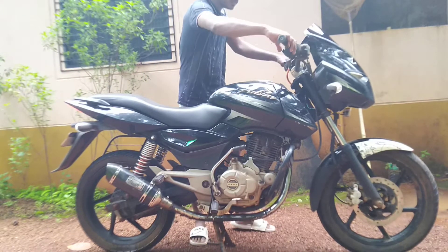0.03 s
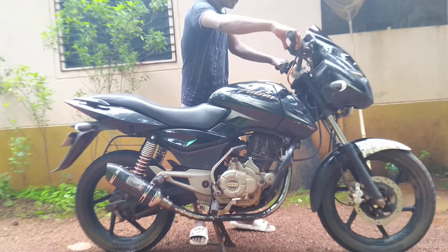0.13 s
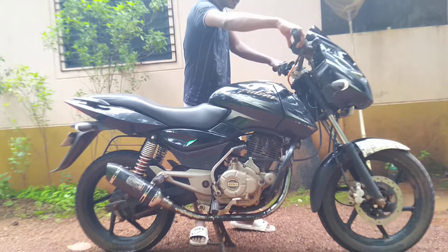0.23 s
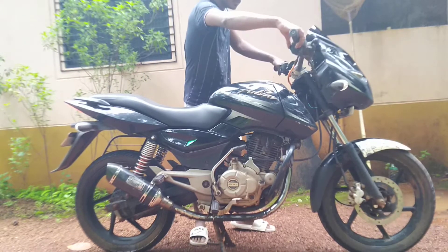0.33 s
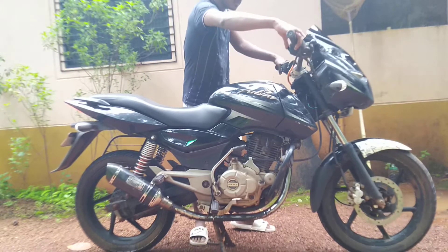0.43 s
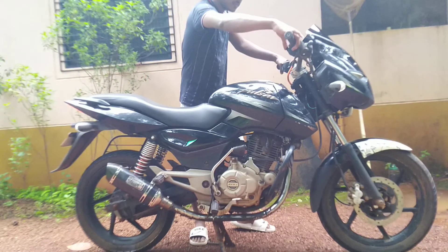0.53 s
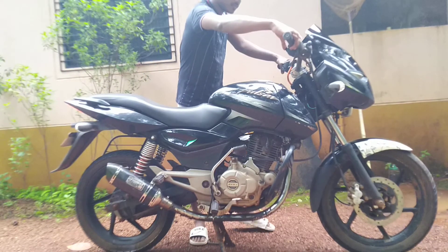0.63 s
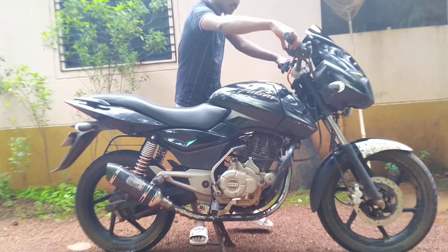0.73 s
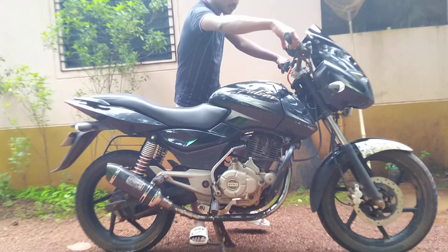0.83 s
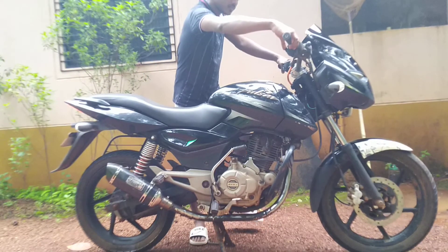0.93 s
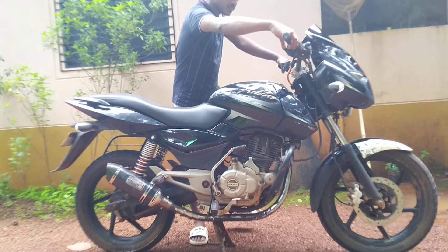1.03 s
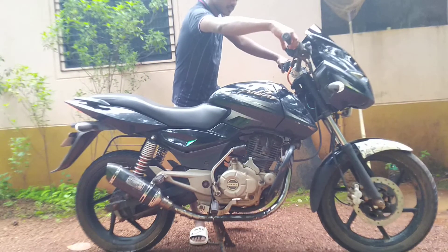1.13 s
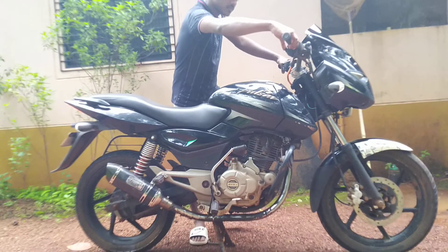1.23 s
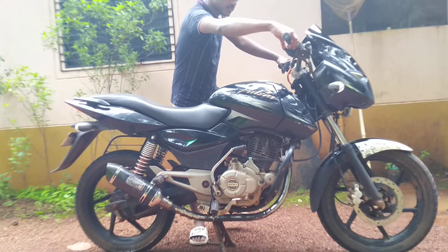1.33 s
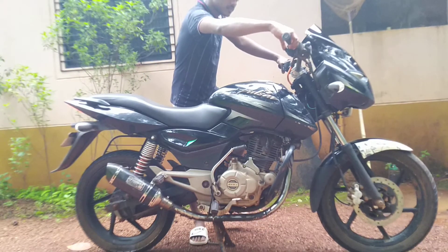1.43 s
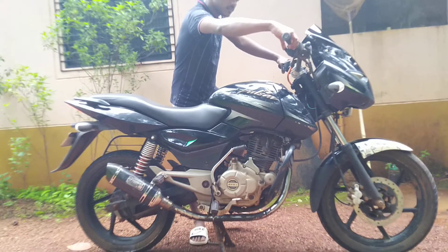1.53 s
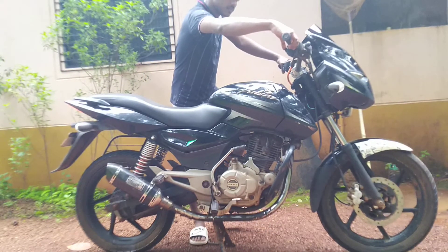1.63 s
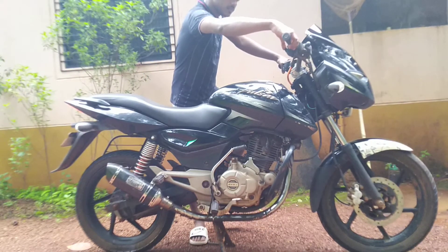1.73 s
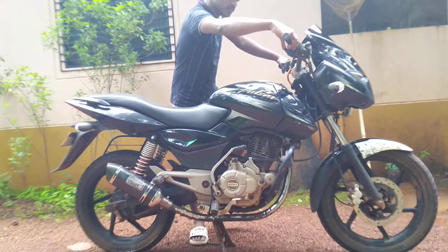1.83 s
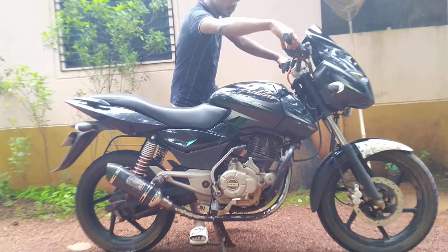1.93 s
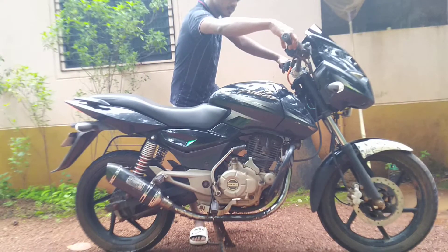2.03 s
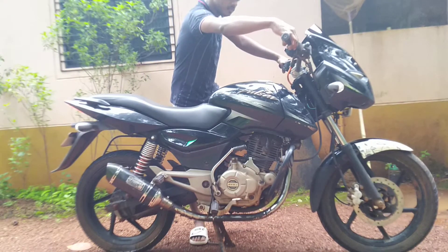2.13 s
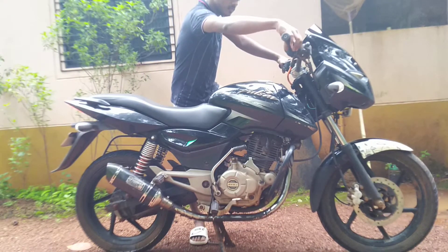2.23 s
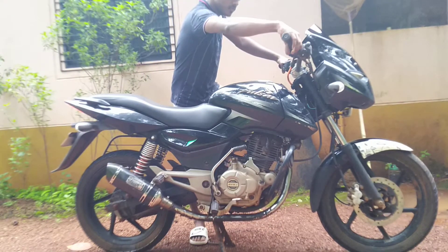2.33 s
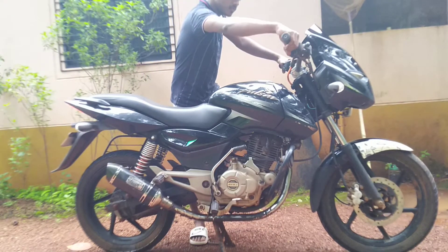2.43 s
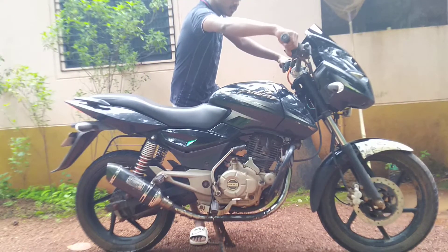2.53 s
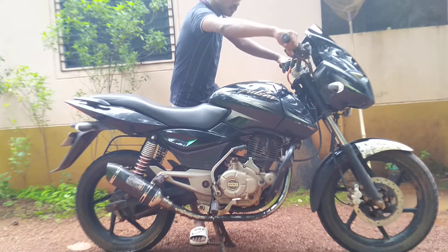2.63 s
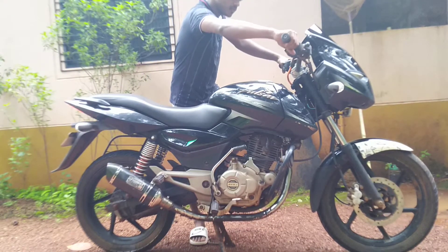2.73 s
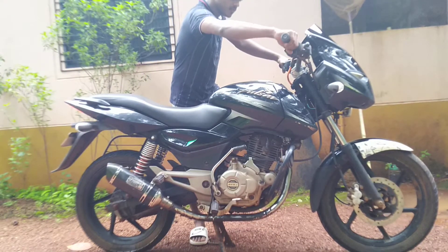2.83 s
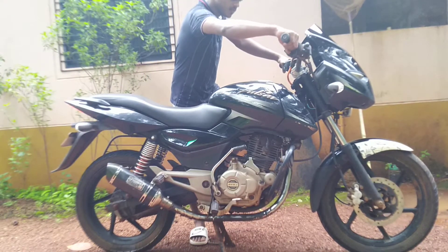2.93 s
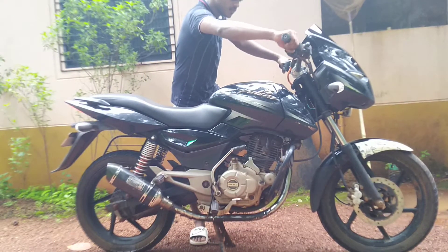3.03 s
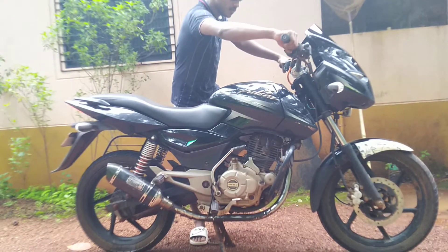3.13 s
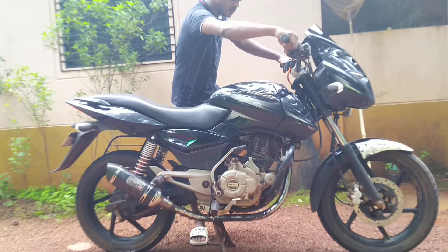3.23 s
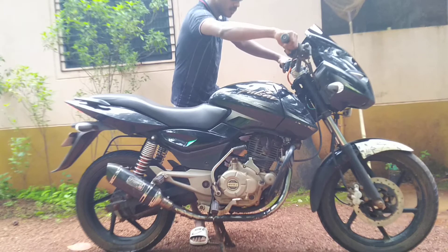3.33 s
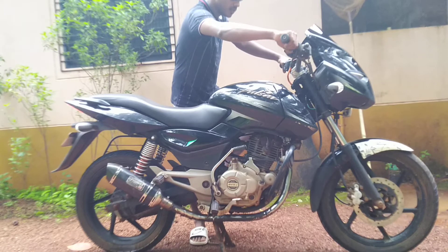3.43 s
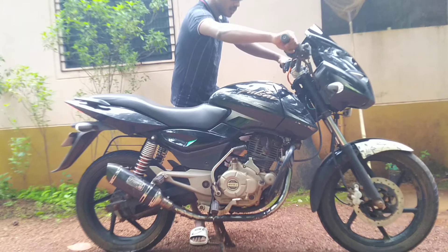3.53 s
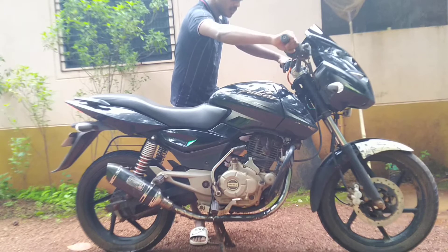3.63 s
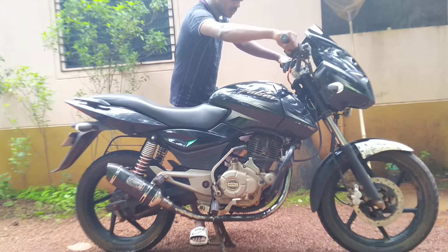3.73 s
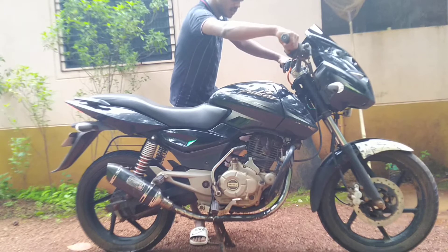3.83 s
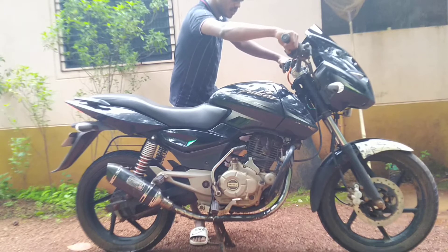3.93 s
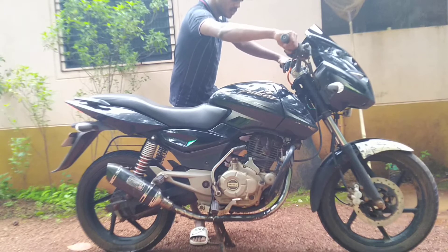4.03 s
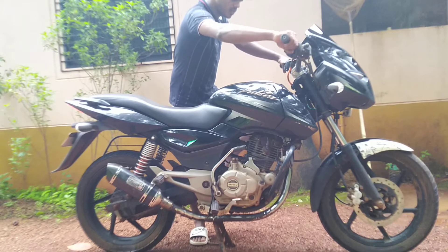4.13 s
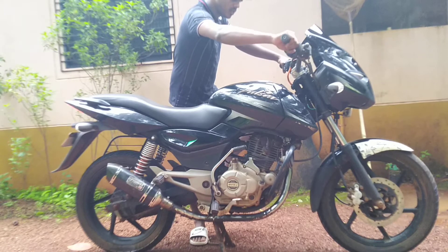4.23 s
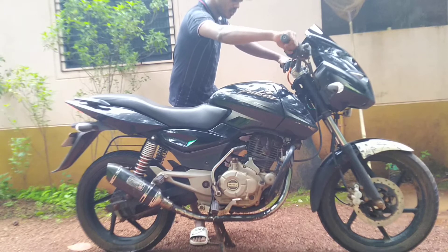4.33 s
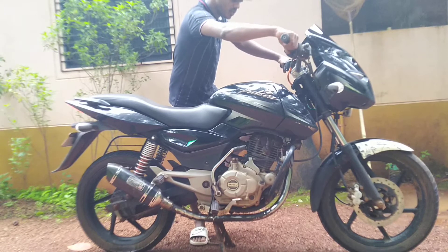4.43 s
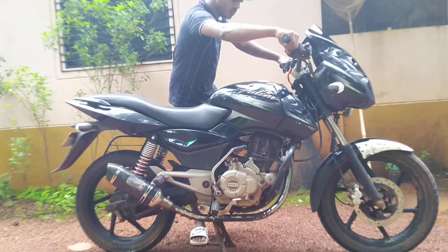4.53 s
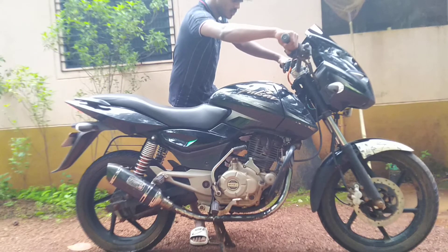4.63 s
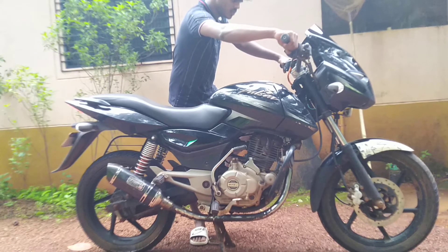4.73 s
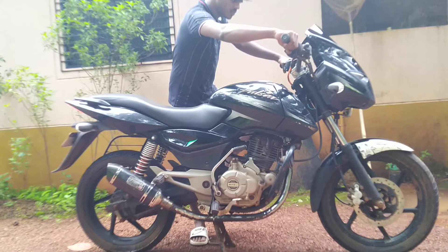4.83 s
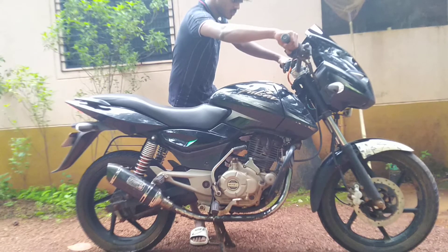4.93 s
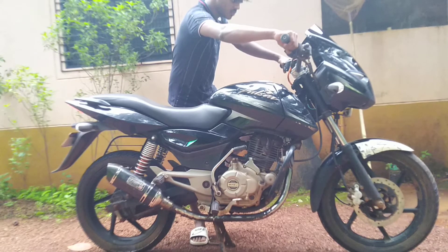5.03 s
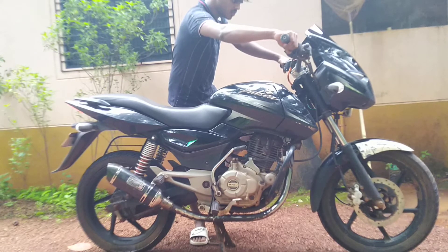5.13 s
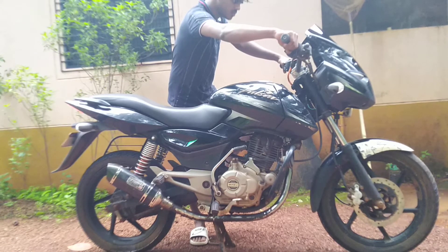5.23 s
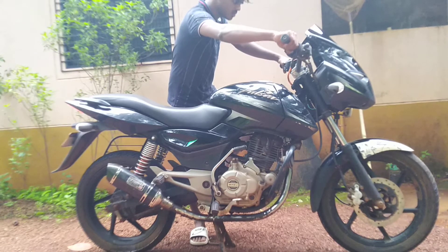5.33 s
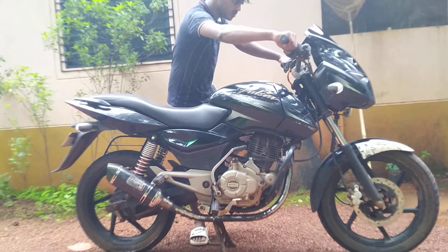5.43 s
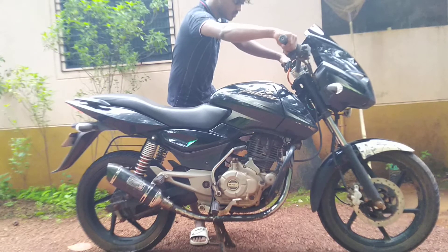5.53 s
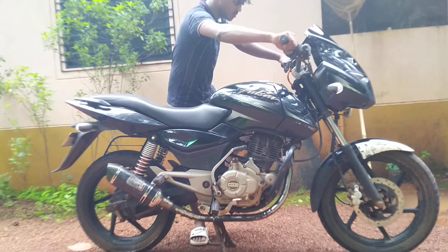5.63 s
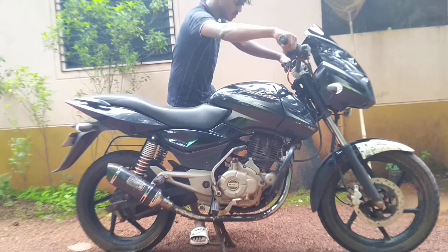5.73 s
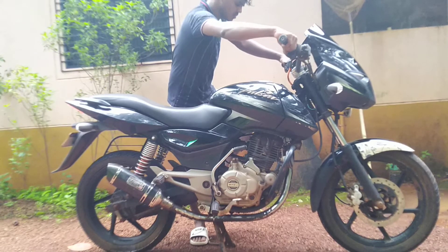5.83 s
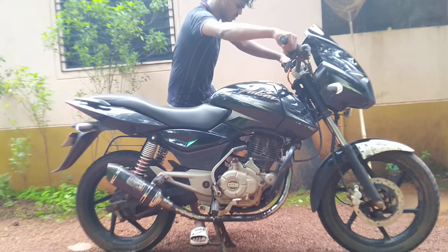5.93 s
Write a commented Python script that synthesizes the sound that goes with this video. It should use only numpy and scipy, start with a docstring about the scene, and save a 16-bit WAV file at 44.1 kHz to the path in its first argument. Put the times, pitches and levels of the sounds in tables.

```python
"""A single-cylinder motorcycle beside a house: the starter whirs, the engine catches, idles, then is blipped.
Every firing is one pressure pulse through the silencer: round with the throttle shut, a sharp bark with it open.
Gas noise rasps and spits behind the pulses; the crankcase clatters with speed; geared teeth make the whirr.
A wall and the yard answer; behind lie outdoor air, a distant motor's hum, faint tones and handlebar clicks."""
import sys
import numpy as np
from scipy import signal
from scipy.fft import rfft, irfft, next_fast_len
from scipy.io import wavfile
from scipy.ndimage import map_coordinates

SR = 44100
rng = np.random.default_rng(int(sys.argv[2]) if len(sys.argv) > 2 else 0)


def dump(signal):
    """Clip the signal to [-1, 1] and save it as 16-bit WAV at the path in sys.argv[1]."""
    limited = np.clip(np.atleast_2d(signal).T, -1, 1)
    pcm = np.round(limited * 32767).astype(np.int16)
    wavfile.write(sys.argv[1], SR, pcm)


N = 264159
TIME = np.arange(N) / SR
CRUISE_RATE_HZ = 26.1  # firings per s; octaves of speed count from here

# throttle twists: (opens [s], shuts [s], rise [s], opening [0-1], deep boom change [dB])
BLIPS = [(2.709, 2.937, 0.34, 0.93, 1), (3.051, 3.21, .04, 0.84, 1), (3.416, 3.79, .09, 0.86, -.5),
         (4.092, 4.391, 0.062, 0.92, -3), (5.077, 5.113, 0.05, 0.6, 0.5), (5.163, 5.185, 0.034, .65, 4),
         (5.276, 5.516, 0.12, 0.82, -1), (5.63, 5.742, 0.022, 0.81, -7.5)]
RELEASE_S = 0.04  # the throttle springs shut


def throttle(at=TIME):
    """Throttle opening 0-1, and the change in dB that it makes to the deep boom."""
    opening, boom_db = 0, 0
    for opens, shuts, rise, depth, db in BLIPS:
        rising = (at - opens) / rise
        falling = 1 - (at - shuts) / RELEASE_S
        twist = np.clip(np.minimum(rising, falling), 0, 1)
        opening = opening + depth * twist
        boom_db = boom_db + db * twist
    return opening, boom_db


# separate firings as the engine catches, idles and picks up: (time [s], burn force [dB])
PUFFS = [(1.385, 2.5), (1.479, 2.5), (1.568, -4.5), (1.666, 0), (1.777, .5), (1.887, 0.5), (2.003, -.5),
         (2.119, 0.5), (2.231, 0.5), (2.342, 0.5), (2.448, 1), (2.557, 0.5), (2.669, 0.5), (2.778, 4.5),
         (2.848, 3.5), (2.903, 2.5), (2.953, -0.5), (3.004, -1), (3.051, -3.5)]
# pulse with the throttle shut: (boom [dB], body [dB], bark [dB])
PUFF_DB = (39.5, 31.5, 15)
# added by a full throttle: (boom [dB], body [dB], bark [dB])
PUFF_THROTTLE_DB = (-2.5, 0.5, 13.5)


def idle_firings():
    """Rows (s, boom, body, bark) of separate puffs; a stronger burn is sharper, its boom stays."""
    times, force_db = np.transpose(PUFFS)
    opening, boom_db = throttle(times)
    burn_db = np.column_stack([boom_db, force_db, force_db])
    strength = PUFF_DB + np.outer(opening, PUFF_THROTTLE_DB) + burn_db
    return np.column_stack([times, strength])


# engine speed once the firings run together: (time [s], firing rate [1/s])
SPEED = [(3.103, 21.29), (3.238, 27.94), (3.427, 22.69), (3.562, 26.48), (3.682, 36.15), (3.77, 41.08),
         (3.803, 37.98), (3.859, 40.32), (4.107, 33.52), (4.26, 40.48), (4.425, 46.93), (4.709, 38.9),
         (4.995, 31.72), (5.2, 27.02), (5.378, 29.37), (5.501, 30.65), (5.765, 33.4), (5.99, 29.46)]
# pulse strength, throttle shut: (firing rate [1/s], boom [dB], body [dB], bark [dB])
COASTING = [(25.9, 39.5, 21, 18.5), (31.4, 35.5, 30, 20.5), (38.5, 36, 33.5, 25), (47.6, 30.5, 37.5, 27)]
# pulse strength, throttle open: (firing rate [1/s], boom [dB], body [dB], bark [dB])
PULLING = [(24.4, 34.2, 36, 29.2), (30.4, 27.3, 39.7, 34.5), (45, 37.2, 30.2, 36.8)]


def firings(jitter_s, scatter_db):
    """Rows (s, boom, body, bark), one per engine cycle; speed and throttle set each pulse's strength."""
    cycles = np.cumsum(curves(SPEED)[0] * (TIME >= SPEED[0][0])) / SR
    times = TIME[np.searchsorted(cycles, np.arange(int(cycles[-1]) + 1), side="right")]
    chance = rng.standard_normal((len(times), 2))
    speed = curves(SPEED, times)[0]
    opening, boom_db = throttle(times)
    shut = np.array(curves(COASTING, speed))
    wide = np.array(curves(PULLING, speed))
    strength = (shut + opening * (wide - shut)).T + np.outer(boom_db, [1, 0, 0])
    # one draw per firing moves its time, the other raises or lowers boom, body and bark together
    jittered = times + jitter_s * opening * chance[:, 0]
    return np.column_stack([jittered, strength + scatter_db * chance[:, 1:]])


# silencer's broad colour: (frequency [Hz], level [dB])
PIPE = [(25, -60), (48, -17.5), (68, -6.5), (95, -1.5), (165, -4), (240, -4.5), (380, -14), (510, -21.5),
        (680, -16.5), (800, -32.5), (1020, -19.5), (1400, -47.5), (2500, -53.5), (6000, -77)]
# tailpipe's higher resonances: (frequency [Hz], width [Hz], lift [dB])
PIPE_MODES = [(332.3, 15, 5.5), (397.4, 93, 3), (463.6, 28, 4), (545, 11, 6), (619, 100, 5.5),
              (683, 48, 5.5), (920, 75, 3.5), (1050, 76, -6)]
# deep resonances for single puffs: (frequency [Hz], width [Hz], lift [dB])
PUFF_MODES = [(85.2, 14.9, 11.5), (173.6, 21, 10.5), (245, 60, 4.5)]
# deep resonances in steady flow: (frequency [Hz], width [Hz], lift [dB])
FLOW_MODES = [(97.1, 40.7, 10.63), (156.4, 37, 9.1)]
# further gas surges after the first blow, under load: (share of the cycle [0-1], level [dB])
SURGES = [(0.132, -9), (0.259, -3.5), (.52, -4.5)]
# surge colour: (frequency [Hz], level [dB])
SURGE_COLOUR = [(170, -31), (320, -4), (420, 3.5), (700, -5.5), (1400, -8)]
SURGE_FADE_DB_PER_OCTAVE = 16  # above cruising speed the surges merge with the blow
FRONT_DB_PER_OCTAVE = 11.5  # and the blow's front gets steeper


def exhaust(fired, deep_modes, ripple_db, dull_db, valve_db, delay_s, size=8192):
    """Each pulse rings the silencer; strong barks have steep fronts, an open throttle adds surges."""
    hz, track = np.fft.rfftfreq(size, 1 / SR), np.zeros(N)
    pipe = along(PIPE, hz) + lifts(deep_modes + PIPE_MODES, hz)
    speeds, openings = curves(SPEED, fired[:, 0])[0], throttle(fired[:, 0])[0]
    for (s, boom, body, bark), speed, opening in zip(fired, speeds, openings):
        ripple = map_coordinates(rng.standard_normal(len(hz)), [hz / 110]) * np.clip(hz / 700, 0, 1)
        softness = np.clip((26 - bark) / 12, 0, 1)  # weak pulses have round fronts
        revved = max(np.log2(speed / CRUISE_RATE_HZ), 0)
        front = bark + dull_db * softness
        edge = front + FRONT_DB_PER_OCTAVE * revved
        source = along([(95, boom), (165, body), (430, bark), (650, front), (1400, edge)], hz)
        # coasting, gas flows for the third of a cycle that the valve is open:
        # every third order stands out and glides
        comb = np.cos(2 * np.pi * (hz / speed - 1) / 3) - 0.5
        coasting = np.clip(1 - opening, 0, 1) * np.clip((hz - 200) / 250, 0, 1)
        db = pipe + source + valve_db * coasting * comb + ripple_db * amp(bark - 36) * ripple
        cepstrum = irfft(db * np.log(10) / 20)[:size // 2]
        cepstrum[1:] *= 2  # causal: the ringing follows the blow
        blow = np.exp(rfft(cepstrum, size))
        surges = sum(amp(level) * np.exp(-2j * np.pi * hz * share / speed) for share, level in SURGES)
        surge_db = along(SURGE_COLOUR, hz) - SURGE_FADE_DB_PER_OCTAVE * revved
        surges *= np.clip(2 * opening, 0, 1) * amp(surge_db)
        add(track, s + delay_s, irfft(blow * (1 + surges)))
    return track


def running(times, level_db, per_octave_db, throttle_db):
    """Gain of a noise that starts with the first firing and follows speed and throttle."""
    speed = np.interp(TIME, (times[1:] + times[:-1]) / 2, 1 / np.diff(times))
    octaves = np.log2(speed / CRUISE_RATE_HZ)
    gain_db = level_db + per_octave_db * octaves + throttle_db * throttle()[0]
    return amp(gain_db) * (TIME > times[0])


COAST_UNTIL_S, COAST_FADE_DB_PER_S = 1.84, 32.5


def starter_coast(at=TIME):
    """Gain 0-1 of the released starter: it holds from the first firing, then fades."""
    fade_db = -COAST_FADE_DB_PER_S * np.maximum(at - COAST_UNTIL_S, 0)
    return amp(fade_db) * (at >= PUFFS[0][0])


# turbulent gas at the outlet: (frequency [Hz], level [dB])
RASP = [(150, -30.5), (300, 4), (680, 4), (800, -11.5), (1020, -8.5), (1400, -0.5), (3000, -24),
        (7000, -57)]
# its treble: (frequency [Hz], level [dB])
HISS = [(3000, -38.5), (5500, 3.5), (7600, -17.5), (9500, -2), (15000, -2)]
# sharp cracks as the throttle opens: (time [s], peak [dB])
CRACKS = [(2.7603, -40), (2.8483, -45.5), (2.9021, -45.5), (3.1007, -42.5), (3.1471, -42.5)]
HISS_DB, HISS_PER_OCTAVE_DB, HISS_THROTTLE_DB = -66, 8.5, 0
SPIT_DB = -75  # gas with each separate firing
COAST_HISS_DB = -68.5


def gas(fired):
    """Turbulent gas behind each pulse rasps and spits, its rasp stronger under load."""
    times, bark = fired[:, 0], fired[:, 3]
    rasp_db = bark - 74 + 3 * throttle(times)[0]
    rasp = bursts(times + 0.0012, rasp_db, rise=0.0009, decay=0.013) * noise(RASP, PIPE_MODES)
    gate_db = bark - 31 + rng.normal(0, 3, len(times))
    gate = unit(0.5 + bursts(times + 0.0018, gate_db, rise=0.0004, decay=0.003))
    engine_hiss = running(times, HISS_DB, HISS_PER_OCTAVE_DB, HISS_THROTTLE_DB)
    flow = (engine_hiss + amp(COAST_HISS_DB) * starter_coast()) * gate
    puffs, force_db = np.transpose(PUFFS)
    spit = bursts(puffs + 0.0018, SPIT_DB + force_db, rise=0.0005, decay=0.0027)
    cracks, peak_db = np.transpose(CRACKS)
    crack = bursts(cracks + 0.0005, peak_db - 5, rise=0.0003, decay=0.0031)  # peak to rms
    return rasp + (flow + spit + crack) * noise(HISS)


# crankcase colour: (frequency [Hz], level [dB])
CASE = [(200, -13.5), (600, -3), (1000, -0.5), (1400, -4.5), (2000, -1), (3200, -9.5), (5000, -13.5),
        (6500, -21), (7700, -40.5), (15000, -41.5)]
# crankcase ringing: (frequency [Hz], width [Hz], lift [dB])
CASE_MODES = [(1040, 70, 0.47), (1730, 92, 4.5), (2075, 83, 2), (2630, 31, 1.4), (3070, 130, 7.1),
              (3600, 27, 0.76)]
CLATTER_DB, CLATTER_PER_OCTAVE_DB, CLATTER_THROTTLE_DB = -49.5, 5, 2.5
RATTLE_DB = -46  # gears before each separate firing
COAST_WHIRR_DB, COAST_RATTLE_DB = -50.5, -42.5  # added by the coasting starter


def crankcase(fired, tick_db, scatter_db, ticks_per_cycle=5):
    """Valves and chain tick several times a cycle; at idle the gears rattle as the piston compresses."""
    times = fired[:, 0]
    tick_cycles = np.arange(len(times) * ticks_per_cycle) / ticks_per_cycle
    ticks = np.interp(tick_cycles, np.arange(len(times)), times)
    chance = rng.standard_normal((len(ticks), 2))
    tick_times, tick_levels = ticks + 0.00027 * chance[:, 0], tick_db + scatter_db * chance[:, 1]
    ticking = np.minimum(bursts(tick_times, tick_levels, rise=0.0003, decay=0.0066), 4)
    clatter = running(times, CLATTER_DB, CLATTER_PER_OCTAVE_DB, CLATTER_THROTTLE_DB)
    level = np.hypot(clatter, amp(COAST_WHIRR_DB) * starter_coast())

    puffs, force_db = np.transpose(PUFFS)
    strain_db = np.full(len(puffs), COAST_RATTLE_DB)
    straining = starter_coast() * bursts(puffs - 0.022, strain_db, rise=0.024, decay=0.018)
    rattle = bursts(puffs - 0.011, RATTLE_DB + 1.3 * force_db, rise=0.012, decay=0.007)
    squeeze = np.hypot(straining, rattle) * amp(3 * wobble(500))
    dulling = lambda hz: amp(along([(3500, 4), (6000, -6.5)], hz))
    chuff = filtered(squeeze * noise(CASE, CASE_MODES), dulling)
    return level * unit(1 + ticking) * noise(CASE, CASE_MODES) + chuff


# starter motor: (time [s], gear teeth rate [1/s], level [dB])
STARTER = [(1.279, 590, -57), (1.283, 690, -23), (1.297, 690, -35), (1.312, 710, -23.5),
           (1.324, 810, -27.5), (1.34, 1000, -23.5), (1.36, 1050, -26), (1.372, 1040, -36.5),
           (1.385, 1000, -47), (1.42, 1000, -70.5)]
# its colour: (frequency [Hz], level [dB])
STARTER_COLOUR = [(200, -46), (450, -18.5), (1020, -6.5), (1500, -6), (2070, -0.5), (2500, -10),
                  (3000, -7.5), (4100, -12.5), (5500, -24.5), (9000, -31), (15500, -35)]


def starter(grind_db, rough, harmonics=10):
    """The starter's gear teeth mesh, speeding up then easing, and ring the crankcase."""
    teeth, db = curves(STARTER)
    phase = 2 * np.pi * np.cumsum(teeth * (1 + rough * wobble(400))) / SR
    whine = sum(np.sin(k * phase + rng.uniform(0, 2 * np.pi)) for k in np.arange(harmonics) + 1)
    grind = amp(grind_db) * noise([(300, 0.021), (15000, 0.01)])  # near white
    mesh = (unit(whine) + grind) * amp(2.1 * wobble(300))
    ring = filtered(mesh, lambda hz: amp(along(STARTER_COLOUR, hz) + lifts(CASE_MODES, hz)))
    turning = (TIME > STARTER[0][0]) & (TIME < STARTER[-1][0])
    return amp(db) * turning * ring / ring[:, turning].std()


# starter whine as it spins down: (time [s], frequency [Hz], level [dB])
RUNDOWN = [(1.39, 5100, -70), (1.45, 5000, -76), (1.57, 4850, -63), (1.63, 4360, -67), (1.85, 3920, -66.5),
           (2.2, 3410, -76)]


def starter_rundown():
    """A fuzzy whine sinks in pitch as the released starter spins down."""
    return narrow(RUNDOWN, width_hz=110)


def house_wall(x):
    """One coloured echo, delayed by the path to the wall and back."""
    delay_s = 0.0127
    colour = [(140, -20), (330, -8), (700, -12), (2000, -20)]
    return filtered(x, lambda hz: amp(along(colour, hz)) * np.exp(-2j * np.pi * hz * delay_s))


# yard reverberation: (frequency [Hz], decay by 60 dB [s])
YARD = [(100, 0.22), (1000, 0.21), (8000, 0.082)]


def yard(x):
    """A short diffuse answer from walls and ground: noise tails dying at a rate set by frequency."""
    hz, t, z = signal.stft(rng.standard_normal((2, SR // 3)), SR, nperseg=256)
    tail = signal.istft(z * amp(-60 * t / along(YARD, hz)[:, None]), SR, nperseg=256)[1]
    wet = signal.fftconvolve(x, tail / np.linalg.norm(tail[0]), axes=1)[:, :N]
    return filtered(wet, lambda hz: amp(along([(130, -21), (330, -12), (1000, -8)], hz)))


# left over right: (frequency [Hz], level difference [dB])
TILT = [(150, -.3), (1200, -.8), (2800, -2), (5500, -3.5), (10000, -8.5)]


def tilted(x):
    """Left and right differ in level with frequency, half the difference on each side."""
    return filtered(x, lambda hz: amp(along(TILT, hz) * np.array([[0.5], [-0.5]])))


# small clicks at the handlebar: (time [s], peak [dB])
CLICKS = [(0.061, -39.5), (0.156, -36.5)]


def handlebar_clicks():
    """Short bursts of noise in the crankcase's colour."""
    times, peak_db = np.transpose(CLICKS)
    return bursts(times, peak_db - 7, rise=0.0005, decay=0.0097) * noise(CASE, CASE_MODES)  # peak to rms


# distant motor: (frequency [Hz], level [dB])
HUM = [(58.5, -45.5), (87, -60), (145, -56.5)]


def distant_motor():
    """A few low sines whose level and phase waver."""
    hum = 0
    for hz, db in HUM:
        phase = 2 * np.pi * hz * TIME + 0.3 * wobble(1.5)
        hum = hum + amp(db + 1.6 * wobble(2.6)) * np.sqrt(2) * np.sin(phase)
    return hum


# outdoor air: (frequency [Hz], level [dB])
AIR = [(25, -30), (42, -15.5), (58, -12.5), (75, -13), (110, -16.5), (180, -19.5), (330, -21.5),
       (700, -29.5), (1700, -32.5), (3800, -37.5), (6000, -51), (15500, -58)]
# faint hiss that sinks in pitch: (time [s], frequency [Hz], level [dB])
SINKING = [(0.35, 4600, -81), (0.6, 4300, -71), (0.85, 3890, -71), (1.25, 3510, -66), (1.35, 3450, -82)]
# faint, far tone in two steps: (time [s], frequency [Hz], level [dB])
FAR_TONE = [(0.68, 1674, -82), (0.76, 1680, -65), (0.9, 1664, -66), (0.96, 1780, -85), (1.05, 1790, -68),
            (1.27, 1820, -65)]


def background():
    """Coloured noise for the air, a distant motor, a sinking hiss, a far tone and handlebar clicks."""
    air = amp(-50.5) * noise(AIR)
    faint = narrow(SINKING, width_hz=430) + narrow(FAR_TONE, width_hz=54)
    return air + distant_motor() + faint + handlebar_clicks()


def amp(db):
    """Decibels to gain."""
    return 10 ** (np.asarray(db) / 20)


def unit(x):
    """Scale to rms 1."""
    return x / np.sqrt(np.mean(x ** 2) + 1e-20)


def along(points, hz):
    """(Hz, value) points read on a log axis."""
    f, v = np.transpose(points)
    return np.interp(np.log(hz + 1), np.log(f + 1), v)


def lifts(modes, hz):
    """Resonance peaks in dB."""
    return sum(db / (1 + (2 * (hz - centre) / width) ** 2) for centre, width, db in modes)


def curves(rows, at=TIME):
    """Each column after the first, read at the given values of the first."""
    s, *cols = np.transpose(rows)
    return [np.interp(at, s, c) for c in cols]


def wobble(rate_hz):
    """A smooth random curve, rate_hz knots a second."""
    return map_coordinates(rng.standard_normal(int(N * rate_hz / SR) + 4), [TIME * rate_hz])


def filtered(x, response):
    """x times a response of frequency."""
    m = next_fast_len(N + SR // 2)
    return irfft(rfft(x, m) * response(np.fft.rfftfreq(m, 1 / SR)), m)[..., :N]


# left-right likeness of noise: (frequency [Hz], correlation [0-1])
ALIKE = [(200, 0.91), (1000, 0.61), (2500, 0.45), (5000, 0.21), (10000, 0.12)]


def noise(colour, modes=()):
    """Coloured stereo noise of rms 1, near mono in the bass."""
    def shape(hz):
        turn = np.arccos(np.clip(along(ALIKE, hz), 0, 1)) / 2
        return amp(along(colour, hz) + lifts(modes, hz)) * [np.cos(turn), np.sin(turn)]
    mid, side = filtered(rng.standard_normal((2, N)), shape)
    return unit(np.array([mid + side, mid - side]))


def narrow(rows, width_hz):
    """A fuzzy gliding line from (s, Hz, dB) rows."""
    pitch, db = curves(rows)
    sounding = (TIME > rows[0][0]) & (TIME < rows[-1][0])
    phase = 2 * np.pi * np.cumsum(pitch) / SR
    line = wobble(width_hz) * np.sin(phase) + wobble(width_hz) * np.cos(phase)
    return amp(db) * sounding * unit(line)


def add(track, s, sound):
    """Mix a sound in at s seconds."""
    part = track[max(round(s * SR), 0):][:len(sound)]
    part += sound[:len(part)]


def bursts(times, levels_db, rise, decay):
    """An envelope that swells to each time and dies after it; rise and decay in s."""
    track, t = np.zeros(N), np.arange(-SR // 10, SR // 10) / SR
    shape = np.exp(-np.where(t < 0, -t / rise, t / decay))
    for s, db in zip(times, levels_db):
        cut = max(round((1 / 10 - s) * SR), 0)  # samples before the start
        add(track, s - 1 / 10, amp(db) * shape[cut:])
    return track


def scene():
    """The bike, its echo off the house wall, the yard and the outdoors."""
    slow, fast = idle_firings(), firings(jitter_s=0.00008, scatter_db=1.13)
    fired = np.vstack([slow, fast])
    idle = exhaust(slow, PUFF_MODES, ripple_db=8.5, dull_db=-20.5, valve_db=5, delay_s=0.00048)
    revs = exhaust(fast, FLOW_MODES, ripple_db=2.5, dull_db=-9, valve_db=5.5, delay_s=0.0012)
    metal = crankcase(fired, tick_db=-4, scatter_db=5)
    starting = starter(grind_db=5, rough=0.028) + starter_rundown()
    bike = idle + revs + gas(fired) + metal + starting
    return tilted(bike + house_wall(bike) + yard(bike)) + background()


TOP_HZ = 15780


def record(dry, top=1.0):
    """The microphone rounds the highest peaks; nothing is kept above the band limit."""
    order = 6  # knee sharpness
    rounded = dry / (1 + np.abs(dry / top) ** order) ** (1 / order)
    return filtered(rounded, lambda hz: hz < TOP_HZ)


dry = scene()
out = record(dry)
dump(out)
```